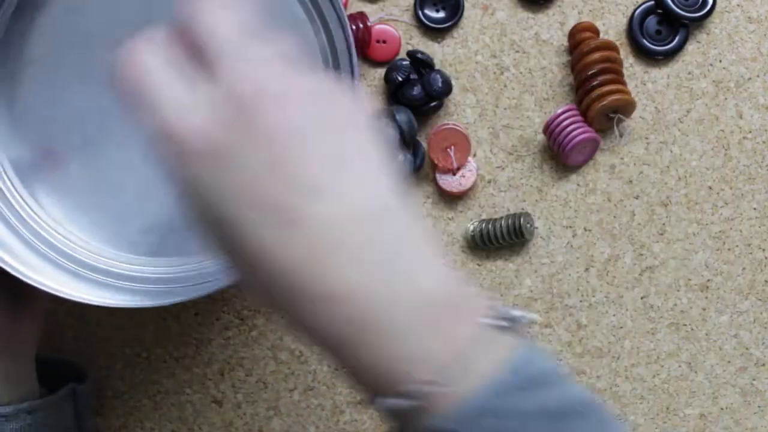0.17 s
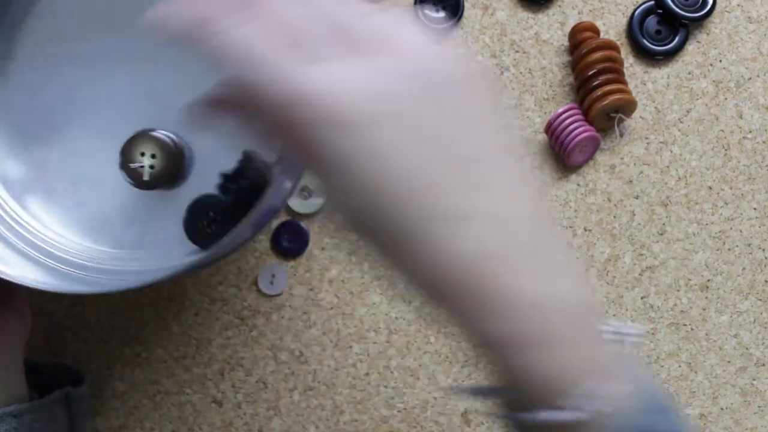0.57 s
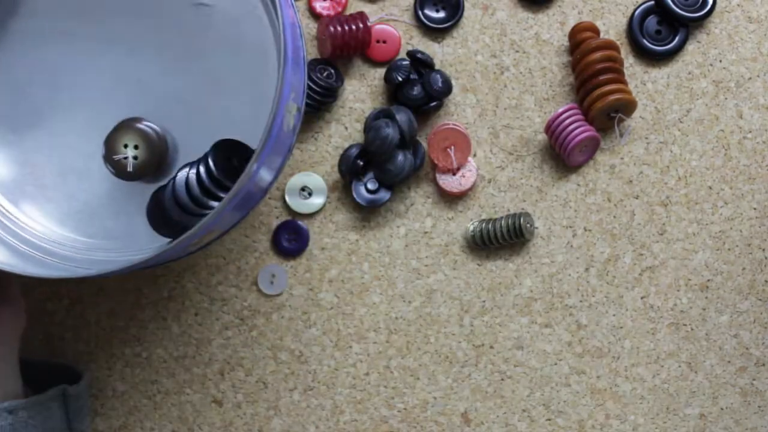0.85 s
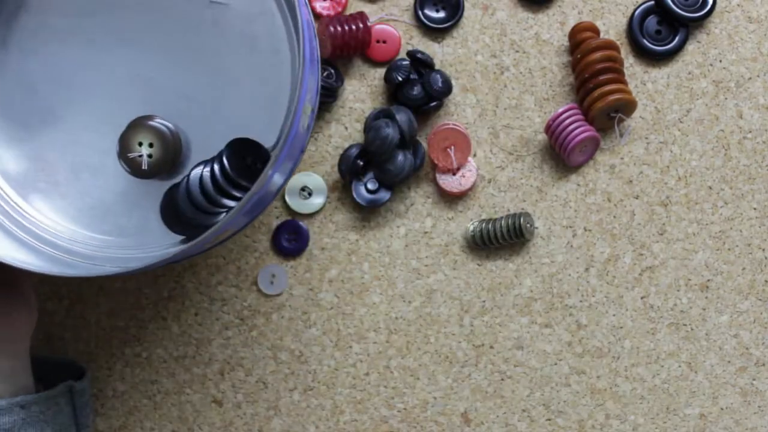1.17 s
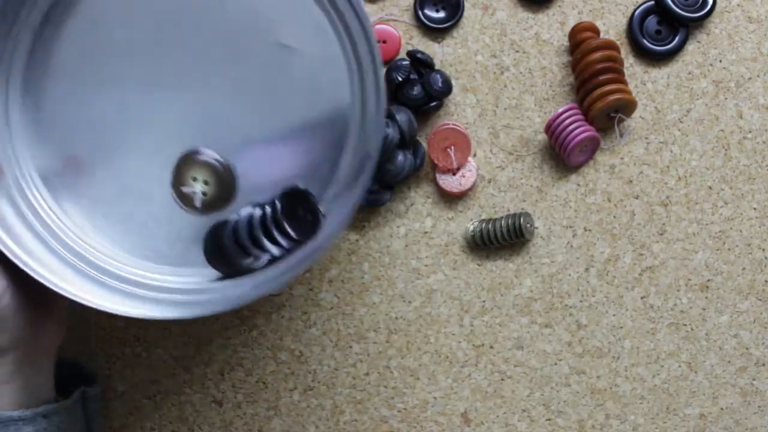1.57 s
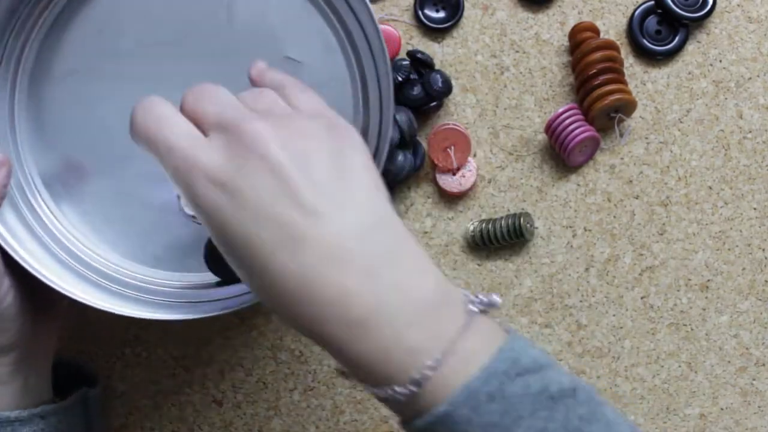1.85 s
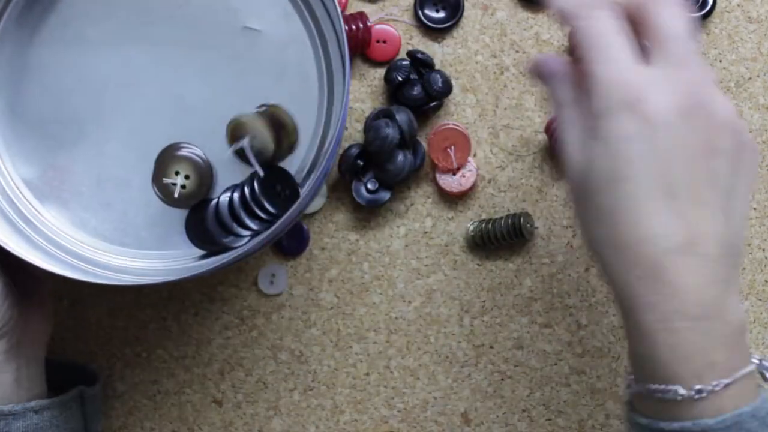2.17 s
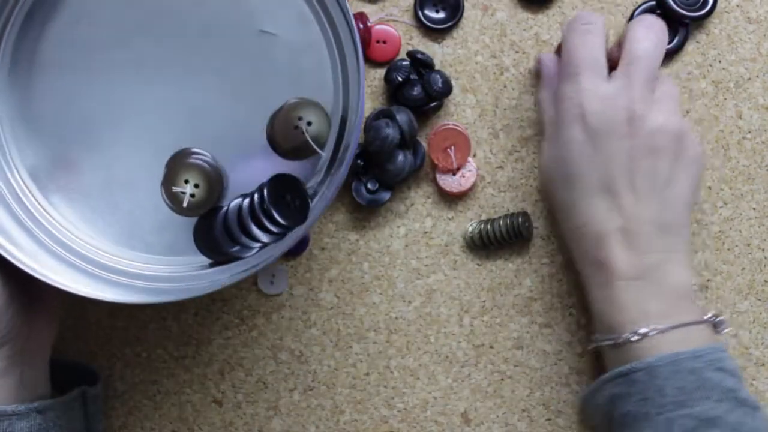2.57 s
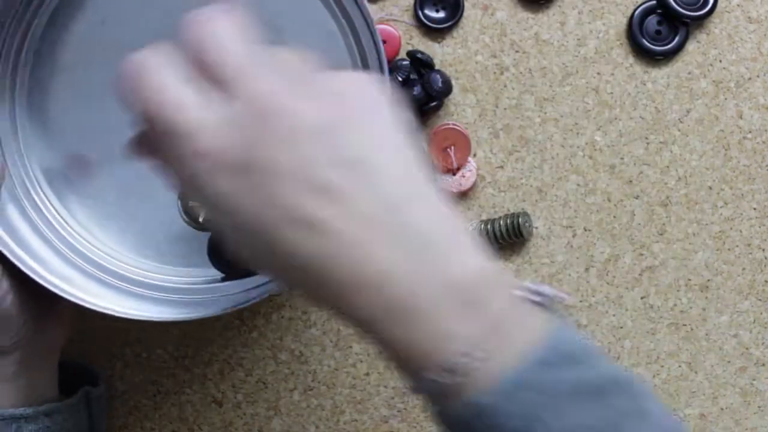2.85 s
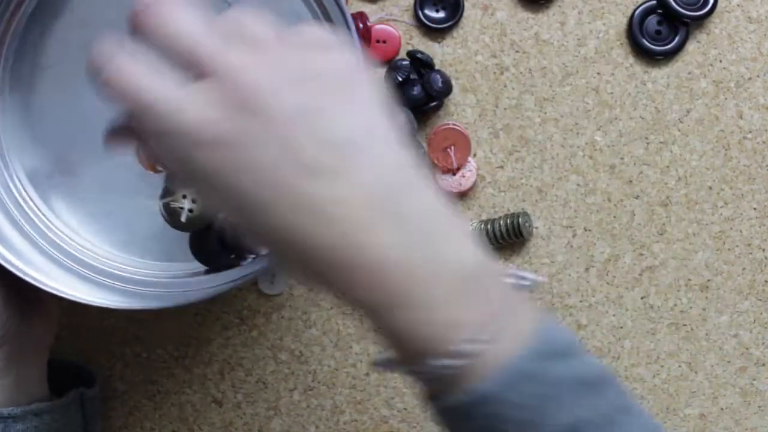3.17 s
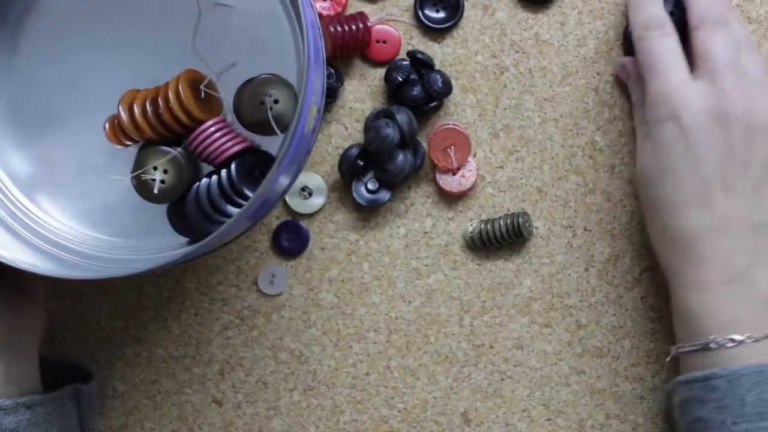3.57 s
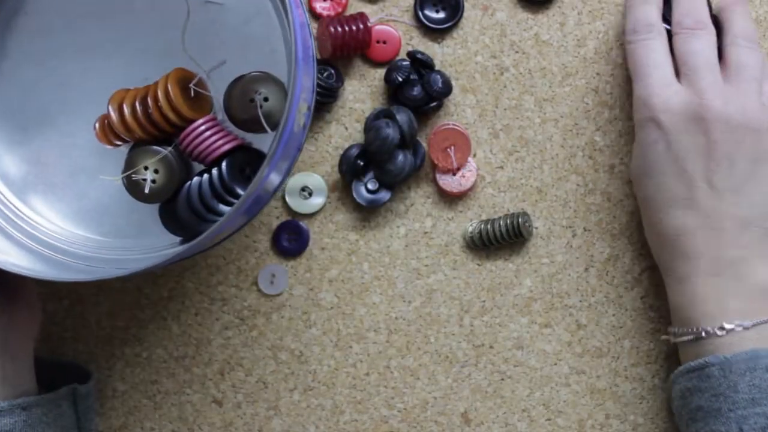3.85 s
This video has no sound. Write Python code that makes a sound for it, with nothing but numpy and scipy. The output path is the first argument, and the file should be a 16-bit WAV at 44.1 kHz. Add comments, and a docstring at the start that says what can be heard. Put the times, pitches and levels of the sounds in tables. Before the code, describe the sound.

Hard plastic clacks on thin sheet metal, each with a brief hollow ring and small bounces. Two drops early on, near-silence, several blows around two seconds, then a hand brushing the table with light button knocks and tiny bracelet chinks. The biggest bundle lands at about three seconds with a gritty distorted thump; quiet handling follows. Close microphone, short indoor echo, faint air noise.

```python
"""Buttons dropped into a metal tin

Threaded stacks of plastic buttons drop into a round metal tin that a hand holds tilted on a table.
Each contact ticks, clacks and excites the modes of the thin base and wall; heavy landings overload the
close microphone. Between drops the hand rubs over the table (coloured noise) and picks up the next stack,
which knocks on the table top (decaying noise bands), in a small quiet room."""
import sys
import numpy as np
from scipy import signal
from scipy.fft import rfft, irfft
from scipy.io import wavfile
from scipy.ndimage import map_coordinates

SR = 44100
rng = np.random.default_rng(int(sys.argv[2]) if len(sys.argv) > 2 else 0)


def log_audio(samples):
    """Write samples as a 16-bit WAV file to the path given in sys.argv[1]."""
    # one column per channel
    frames = np.atleast_2d(samples).T
    # limit to full scale, then quantise
    limited = np.clip(frames, -1, 1)
    pcm = np.round(limited * 32767).astype(np.int16)
    wavfile.write(sys.argv[1], SR, pcm)


N = 177105

# still air with a faint building rumble: (frequency [Hz], relative density [dB])
AIR_SPECTRUM = [(30, -7.5), (65, -9.5), (97, 8.5), (140, -10.5), (300, -1.5), (500, 1), (800, -1),
                (1400, -3.5), (3000, -5.5), (6000, -10), (16000, -13.5)]
AIR_DB = -57
# skin and sleeve on the table: (frequency [Hz], relative density [dB])
RUB_SPECTRUM = [(40, -40), (75, -26.5), (115, -1.5), (190, -6.5), (450, 2), (750, -6), (1250, 0),
                (2200, -10.5), (3700, -14), (4900, -7), (7500, -17), (16000, -27)]
# hand sweeping over the table to a stack:
# (time of firmest contact [s], pressing time [s], sliding time [s], level [dB])
HAND_SWEEPS = [(0, .02, 0.16, -47.5), (2.481, 0.2, 0.24, -39), (3.59, 0.056, 0.058, -41),
               (3.72, 0.044, 0.11, -48), (3.92, 0.12, 0.071, -45.5)]
SLOWING_DB_PER_S, LIFT_S = 64.5, .05  # the rub fades as the hand slows, and stops as it lifts

# buttons jostling lightly as the tin is tilted or the hand reaches in:
# (start [s], length [s], level [dB], extra treble [dB])
TIN_JOSTLES = [(0, .16, -48.5, 0.5), (0.158, .06, -41, -5), (0.381, .06, -38, -1.5), (1.3, .05, -38.5, -12),
               (1.943, 0.059, -31, -9.5)]
JOSTLE_BASS_DB, JOSTLE_TICK_DB = 0.5, -20
JOSTLE_LOW_HZ, JOSTLE_HIGH_HZ = 695, 1700  # range of the modes that a light contact may favour
# a single button tapping the tin:
# (time [s], level [dB], extra bass [dB], extra treble [dB], contact tick [dB], favoured frequency [Hz])
BUTTON_TAPS = [ (0.217, -17.5, -9, -4, -6.5, 745), (0.3065, -30.5, 2, -8.5, -22, 730),
               (0.441, -16, 5, -9.5, -27, 680), (0.7055, -25, 4, -0.5, -4.5, 774),
               (0.822, -30, 8.5, -23, -17, 1523), (1.930, -13.5, -1, -5, 0.5, 1372),
               (2.139, -28, 13.5, -2.5, -13, 1852), (2.163, -8, -36, -10, -30, 3240)]
# a threaded stack landing or toppling in the tin:
# (time [s], level [dB], lead of the edge's touch [s], time its other buttons take to come down [s],
# their extra level [dB], weight as extra bass [dB], hardness as extra treble [dB], contact tick [dB],
# frequency favoured by the struck spot [Hz])
STACK_LANDINGS = [ (0.5175, -5.5, 0.017, .012, -17, 0.5, -0.5, -11.5, 534),
                  (0.5585, -12, 0.0031, .025, -12, 1.5, -3, -11, 590),
                  (0.7405, -12, 0.0064, .036, -11.5, -14, -1, -7, 1510),
                  (1.6966, -23.5, 0.013, .008, -6.5, -10.5, -7.5, -18, 2054),
                  (1.878, -15, 0.0054, .005, -2, -7.5, -5.5, -10, 1156),
                  (2.011, -5, .008, .014, -3.5, 1, -1.5, -18.5, 763),
                  (2.295, -15, .004, .011, -6.5, -1.5, -10, 6.5, 880),
                  (3.111, -5, 0.0075, .048, 2.5, 3.5, -0.5, -4, 787)]
EDGE_DB = -8  # a stack comes down aslant, so the first touch of its edge is light
CUSHION_DB = -11  # only the main contact ticks fully; the thread and the neighbours soften the others
BOUNCE_S, BOUNCE_DB, BOUNCE_SHRINK = .044, -11, 0.99  # first hop, loss per hop, hop length ratio

# strongest modes of the tin, damped by the hand and the buttons in it:
# (frequency [Hz], relative level [dB], t60 [s])
STRONG_TIN_MODES = [ (535.8, -8.5, 0.18), (591, -3, 0.16), (719.2, 2.5, 0.15), (743.7, 3.5, 0.19),
                    (800, -12, 0.32), (835, -1, 0.28), (938, -12.5, 0.24), (987, -14, 0.27),
                    (1119, -8, 0.69), (1181, 0.5, 0.27), (1217, -2.5, 0.21), (1280, -3.5, 0.44),
                    (1271, -10.5, 0.22), (1377, -11, 0.5), (1501, -3.5, 0.15), (1610, -7.5, 0.19),
                    (1860, -7, 0.36), (1990, -7, 0.35), (2120, -16.5, .27), (1983, 0, 0.27),
                    (2043, -7.5, 0.42), (2250, -9, 0.21), (2220, -5.5, 0.19), (2534, -9.5, 0.29),
                    (2630, -10.5, 0.35), (2750, -16.5, .3), (3013, -14.5, 0.25), (3165, -4.5, 0.19),
                    (3230, -11, 0.25), (4010, -6, 0.31)]
# the crowd of weaker modes in the sheet metal: (frequency [Hz], relative density [dB], t60 [s])
SHEET_METAL = [ (150, -27.5, .25), (302.5, -38, .3), (415, -3, 0.4), (600, 1, 0.2), (1007, -4.5, 0.26),
               (1370, 2.5, .42), (2220, -0.5, 0.4), (3010, -7, 0.47), (5100, -10, 0.19), (8670, 1, 0.11),
               (9600, -21.5, 0.14), (16000, -41.5, 0.16)]
# first, quickly spent clack on the metal: (frequency [Hz], relative density [dB], t60 [s])
METAL_CLACK = [(150, -35, 0.033), (297, -25, 0.26), (529, 0, 0.15), (1260, 1.5, 0.1), (2200, -3, 0.081),
               (4150, -6.5, 0.084), (8226, -11, 0.066), (10400, -17, 0.095), (16000, -22.5, .06)]
# hard plastic on metal: (frequency [Hz], relative density [dB], t60 [s])
PLASTIC_TICK = [(300, -25.5, .01), (2000, -7.5, 0.0085), (6000, -0.5, .012), (11700, 1, 0.018),
                (16000, 0.5, 0.0063)]

# low thumps: the overloaded microphone's distortion at the heaviest landings,
# and softer bumps of tin and hand: (time [s], level [dB])
THUMP_TIMES = [(0.441, -41), (0.516, -44.5), (2.018, -21.5), (3.14, -11), (3.911, -42), (3.952, -38)]
# spectrum and decay of a thump: (frequency [Hz], relative density [dB], t60 [s])
THUMP_BANDS = [(30, -22.5, .08), (70, -10.5, .1), (145, 5.5, 0.061), (300, -3.5, 0.058), (901, -31.5, .04),
               (4000, -74, .02)]
# buttons knocking on the table as they are picked up:
# (time [s], level [dB], extra bass [dB], extra treble [dB], delay until it rocks back [s])
BUTTON_KNOCKS = [ (2.429, -35.5, -2, 15.5, .008), (2.443, -22.5, 5.5, 5.5, .038),
                 (2.512, -28.5, 2, 12.5, .012), (2.637, -23, -18.5, -1.5, .008),
                 (3.555, -28, -3, 14.5, .008), (3.6987, -19.5, -11, -34, .028),
                 (3.9103, -34, -10, 11, .039)]
ROCK_DB = -7  # a knocked button rocks back once, more softly
# the table top under a button: (frequency [Hz], relative density [dB], t60 [s])
TABLE_TOP = [(60, -45, .12), (154, -29, 0.2), (480, 2.5, 0.2), (1130, 9, 0.05), (2480, -8, 0.04),
             (6050, -16.5, 0.027), (10700, -29, 0.03), (16000, -46, .02)]
# small metal links of a bracelet: (time [s], frequency [Hz], level [dB], t60 [s])
BRACELET_CHINKS = [(2.448, 14300, -43, .1), (2.472, 10600, -34, 0.03), (2.505, 11060, -34, 0.032)]

# room echo: (frequency [Hz], relative density [dB], t60 [s])
ROOM_ECHO = [(100, -5.5, 0.17), (634, -1.5, 0.48), (1990, -1, 0.38), (4970, 1, 0.42), (9000, -0.5, 0.27),
             (15800, 3.5, 0.18)]
RING = int(.8 * SR)  # longest ring [samples]
AGE = np.arange(RING) / SR  # time since a strike [s]
TOP_HZ = 16150  # upper limit of the recorded band


def undb(db):
    """Logarithmic level: decibels become an amplitude ratio."""
    return 10 ** (np.asarray(db) / 20)


def along(hz, points_hz, values):
    """Logarithmic frequency scale: interpolate a curve along it."""
    return np.interp(np.log(np.maximum(hz, 1)), np.log(points_hz), values)


def noise(spectrum, size):
    """Spectral shaping: white noise is filtered to the given colour and scaled to unit rms."""
    points_hz, db = np.transpose(spectrum)[:2]
    gain = undb(along(np.fft.rfftfreq(size, 1 / SR), points_hz, db))
    x = irfft(rfft(rng.standard_normal(size)) * gain, size)
    return x / x.std()


def decay(t60, size=RING):
    """Exponential damping: the amplitude falls by 60 dB in t60 seconds."""
    return np.exp(-np.log(1000) * AGE[:size] / t60)


def ring_bands(body, size):
    """High modal density: modes struck at once act as noise bands, one per row, each with its own decay."""
    points_hz, _, t60 = np.transpose(body)
    bins_hz = np.fft.rfftfreq(size, 1 / SR)
    # overlapping triangular weights share the spectrum among the bands
    weights = np.array([along(bins_hz, points_hz, row) for row in np.eye(len(points_hz))])
    bands = irfft(rfft(noise(body, size)) * weights, size)
    return bands * decay(t60[:, None], size)


def dense_ring(body, size=6144):
    """Superposition: one blow sums all bands of a body with too many modes to tell apart."""
    return ring_bands(body, size).sum(axis=0)


def shelf(x, corner_hz, db, is_bass):
    """Second-order shelving: a causal filter changes the level on one side of a corner frequency."""
    w = np.tan(np.pi * corner_hz / SR) * 2 * SR  # corner warped for the bilinear transform
    g = undb(db / 4)
    w_zero, w_pole = (w * g, w / g) if is_bass else (w / g, w * g)
    zeros = [1, np.sqrt(2) * w_zero, w_zero ** 2]
    poles = [1, np.sqrt(2) * w_pole, w_pole ** 2]
    b, a = signal.bilinear(zeros, poles, SR)
    x = signal.lfilter(b, a, x)
    return x if is_bass else x * undb(db)


def contact(x, bass_db, treble_db):
    """Contact force spectrum: heavy blows push more bass into a body, hard ones more treble."""
    x = shelf(x, 850, bass_db, is_bass=True)
    return shelf(x, 3600, treble_db, is_bass=False)


def add(track, s, x):
    """Superposition: mix a sound into the track at time s in seconds."""
    start = max(int(s * SR), 0)
    track[start:start + len(x)] += x[:N - start]


def still_air():
    """Stationary noise: still air and a faint building rumble keep a constant level."""
    return undb(AIR_DB) * noise(AIR_SPECTRUM, N)


def hand(grip_db=3.5, grips_per_s=110):
    """Stick-slip friction: skin catches and slips, so the hiss is uneven as the hand presses, slows and lifts."""
    t = np.arange(N) / SR
    grip = np.interp(t * grips_per_s, np.arange(N), rng.standard_normal(N))
    rub = np.zeros(N)
    for s, press_s, slide_s, level_db in HAND_SWEEPS:
        pressure = np.interp(t - s, [-press_s, 0, slide_s, slide_s + LIFT_S], [0, 1, 1, 0])
        slowing_db = SLOWING_DB_PER_S * np.maximum(t - s, 0)
        rub += pressure * undb(level_db - slowing_db)
    return noise(RUB_SPECTRUM, N) * rub * undb(grip_db * grip)


def jostles(scatter_db=4.0, count=4):
    """Random impacts: a few light contacts differ in strength, spacing and favoured modes."""
    contacts = []
    for s, length_s, level_db, treble_db in TIN_JOSTLES:
        slip, size = rng.random(count), rng.standard_normal(count)
        spot_hz = JOSTLE_LOW_HZ * (JOSTLE_HIGH_HZ / JOSTLE_LOW_HZ) ** rng.random(count)
        for k in range(count):
            contact_s = s + length_s * (k + slip[k] / 2) / count
            contact_db = level_db + scatter_db * size[k]
            contacts.append((contact_s, contact_db, JOSTLE_BASS_DB, treble_db, JOSTLE_TICK_DB, spot_hz[k]))
    return contacts


def rattle(x, spread_s=.012, rebound_db=-9, count=4):
    """Repeated impact: after the first button, its neighbours follow within about 12 milliseconds."""
    out = x.copy()
    for delay, size in zip(rng.random(count), rng.standard_normal(count)):
        lag = int(delay * spread_s * SR) + 1
        out[lag:] += undb(rebound_db) * size * x[:-lag]
    return out


def tin(modes_db=-15, sheet_db=-9, clack_db=-1, spot_db=2, favour_db=10, spot_width=0.051, detune=0.0033):
    """Modal excitation: strikes clack and tick, and ring the same modes in shares set by the struck spot."""
    hz, db, t60 = np.transpose(STRONG_TIN_MODES)
    modes = np.sin(2 * np.pi * hz[:, None] * AGE) * decay(t60[:, None])
    sheet = ring_bands(SHEET_METAL, RING)
    ringing = np.vstack([undb(modes_db + db)[:, None] * modes, undb(sheet_db) * sheet])
    out = np.zeros(N)
    for s, level_db, bass_db, treble_db, tick_db, spot_hz in BUTTON_TAPS + landings() + jostles():
        size, side = rng.standard_normal((2, len(ringing)))
        shares = np.sign(side) * undb(spot_db * size)
        nearness = np.exp(-(np.log(hz / spot_hz) / spot_width) ** 2)
        shares[:len(hz)] *= undb(favour_db * nearness)
        # buttons shifting on the sheet retune it a little from strike to strike
        pace = 1 + detune * rng.standard_normal()
        metal = map_coordinates(shares @ ringing, [np.arange(RING) * pace], order=3)
        clack = rattle(dense_ring(METAL_CLACK))
        metal[:len(clack)] += undb(clack_db) * clack
        add(out, s, undb(level_db) * contact(metal, bass_db, treble_db))
        add(out, s, undb(level_db + tick_db) * dense_ring(PLASTIC_TICK, size=2048))
    # so small a sheet radiates almost no bass
    return signal.sosfilt(signal.butter(4, 265, "high", fs=SR, output="sos"), out)


def thumps():
    """Damped low-frequency noise: stands for overload distortion and for softer bumps of tin and hand."""
    out = np.zeros(N)
    for s, level_db in THUMP_TIMES:
        add(out, s, undb(level_db) * dense_ring(THUMP_BANDS))
    return out


def landings(scatter_db=2.5, count=4):
    """Successive impact: a stack's edge touches, it lands, its other buttons follow, and it hops twice."""
    contacts = []
    for s, level_db, edge_s, spill_s, follow_db, bass_db, treble_db, tick_db, spot_hz in STACK_LANDINGS:
        softened = bass_db, treble_db, tick_db + CUSHION_DB, spot_hz
        slip, size = rng.random(count), rng.standard_normal(count)
        contacts.append((s - edge_s, level_db + EDGE_DB, *softened))
        contacts.append((s, level_db, bass_db, treble_db, tick_db, spot_hz))
        for k in range(count):
            button_s = s + spill_s * (k + 1 - slip[k] / 2) / count
            button_db = level_db + follow_db + scatter_db * size[k]
            contacts.append((button_s, button_db, *softened))
        hop_s = s
        for k in range(2):
            hop_s += BOUNCE_S * BOUNCE_SHRINK ** k
            contacts.append((hop_s, level_db + BOUNCE_DB * (k + 1), *softened))
    return contacts


def knocks():
    """Strong damping: plastic on the table top gives short dead knocks, each repeated as the button rocks."""
    out = np.zeros(N)
    for s, level_db, bass_db, treble_db, rock_s in BUTTON_KNOCKS:
        for lag_s, change_db in (0, 0), (rock_s, ROCK_DB):
            knock = contact(dense_ring(TABLE_TOP), bass_db, treble_db)
            add(out, s + lag_s, undb(level_db + change_db) * knock)
    return out


def bracelet():
    """Free vibration: each tiny link pings as a damped sine when the wrist comes down."""
    out = np.zeros(N)
    for s, hz, db, t60 in BRACELET_CHINKS:
        add(out, s, undb(db) * np.sin(2 * np.pi * hz * AGE) * decay(t60))
    return out


def room(x, wet_db=-9, first_echo_s=0.0037):
    """Reverberation: convolution with a decaying noise tail adds the soft return from the walls."""
    onset = np.clip(AGE / first_echo_s - 1, 0, 1)  # silent until the first echo, then fading in
    tail = dense_ring(ROOM_ECHO, size=RING) * onset
    return x + undb(wet_db) * signal.fftconvolve(x, tail / np.linalg.norm(tail))[:N]


def scene():
    """Linear superposition: hand, tin, thumps, knocks and bracelet sound in the room, over still air."""
    sources = hand() + tin() + thumps() + knocks() + bracelet()
    return (room(sources) + still_air())[None]


def record(dry):
    """Overload and band limiting: peaks beyond full scale clip flat, then the top of the band is cut."""
    clipped = np.clip(dry, -1, 1)
    return signal.sosfilt(signal.ellip(10, .1, 60, TOP_HZ, fs=SR, output="sos"), clipped)


dry = scene()
out = record(dry)
log_audio(out)
```